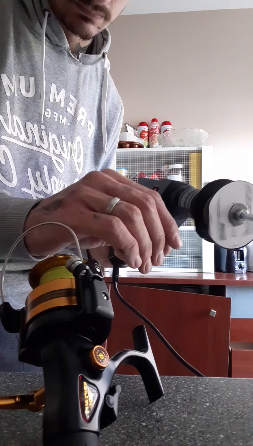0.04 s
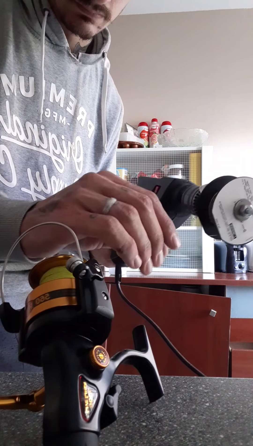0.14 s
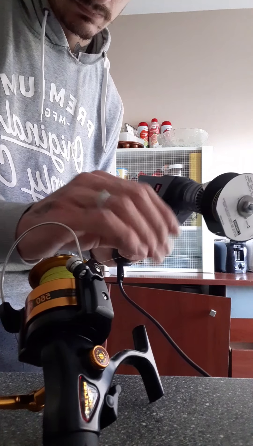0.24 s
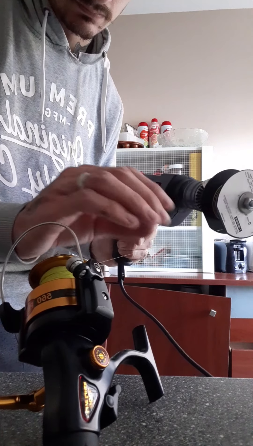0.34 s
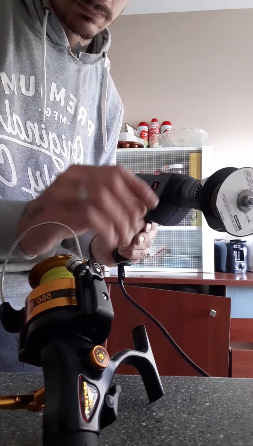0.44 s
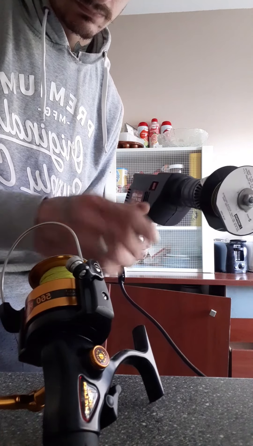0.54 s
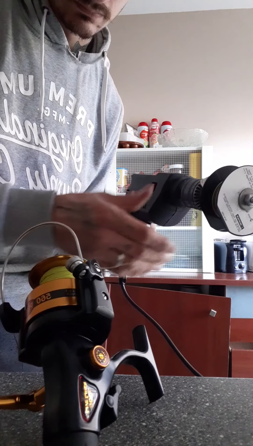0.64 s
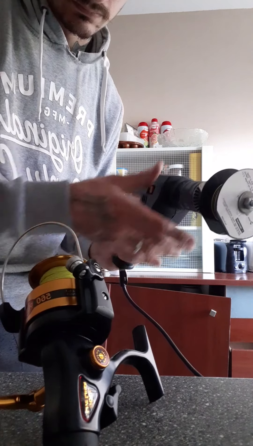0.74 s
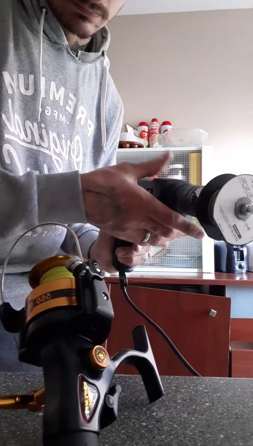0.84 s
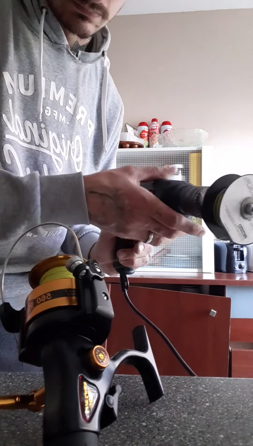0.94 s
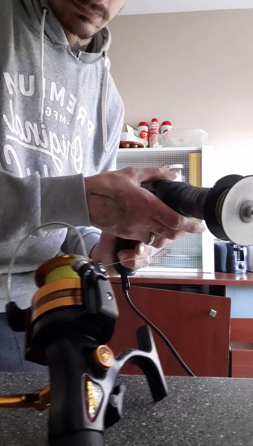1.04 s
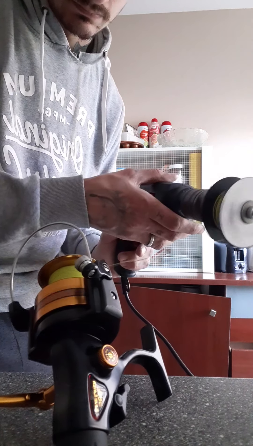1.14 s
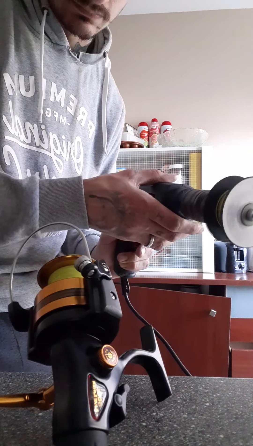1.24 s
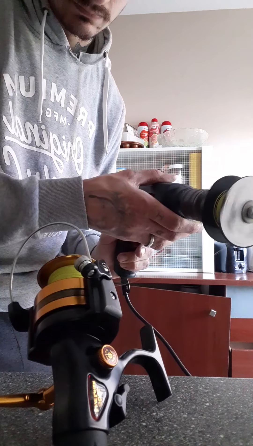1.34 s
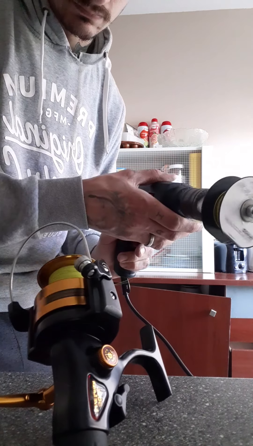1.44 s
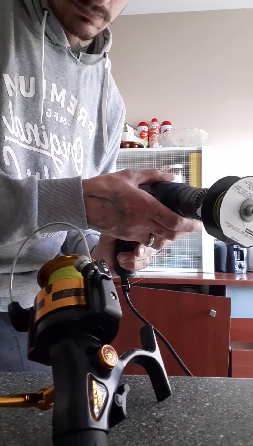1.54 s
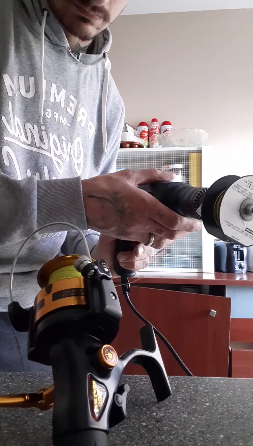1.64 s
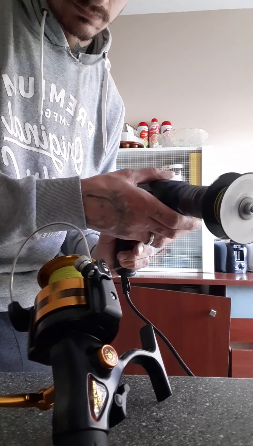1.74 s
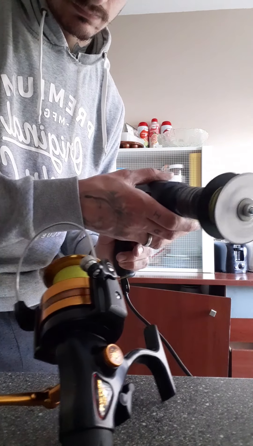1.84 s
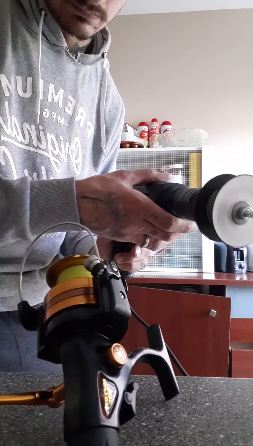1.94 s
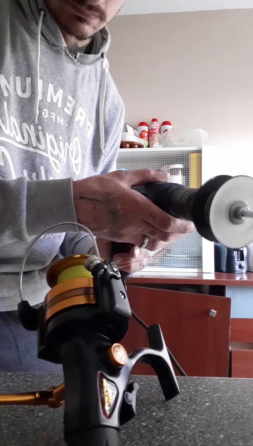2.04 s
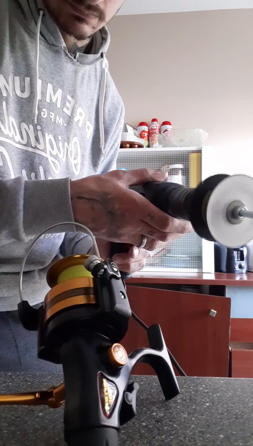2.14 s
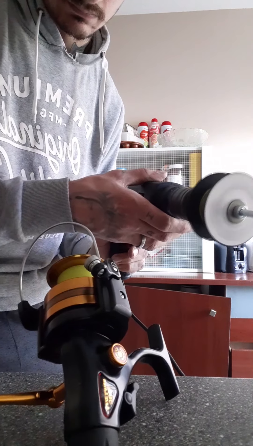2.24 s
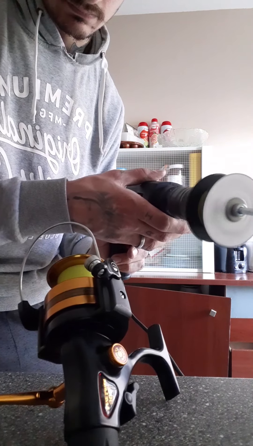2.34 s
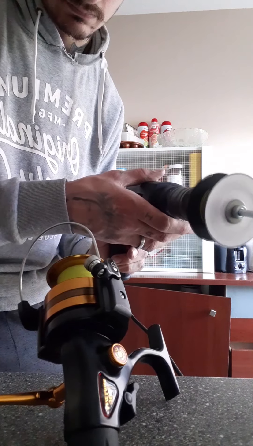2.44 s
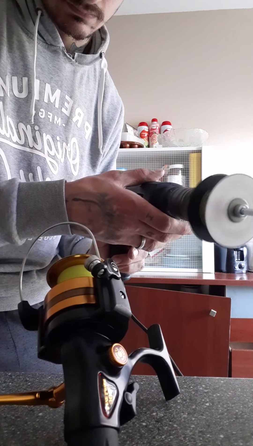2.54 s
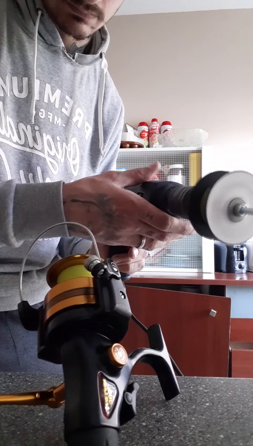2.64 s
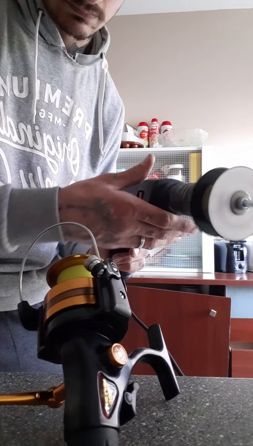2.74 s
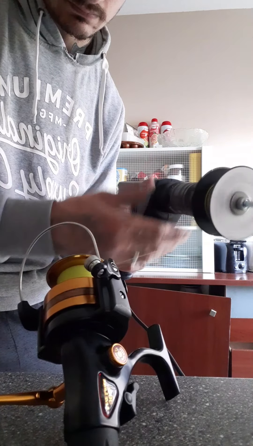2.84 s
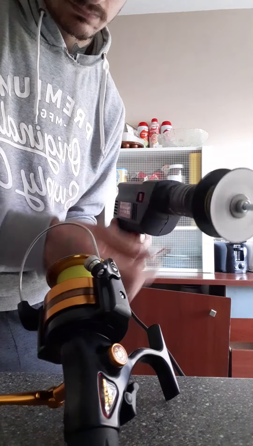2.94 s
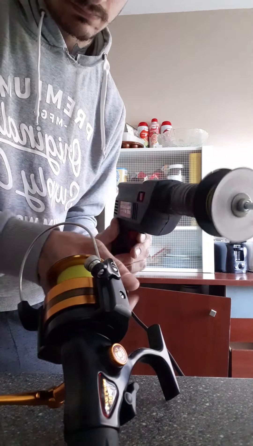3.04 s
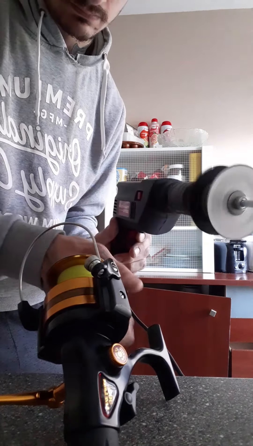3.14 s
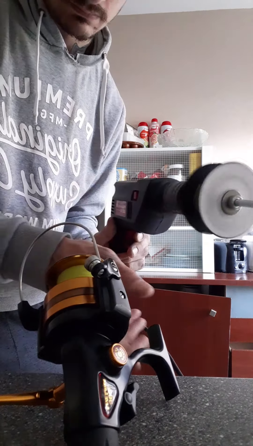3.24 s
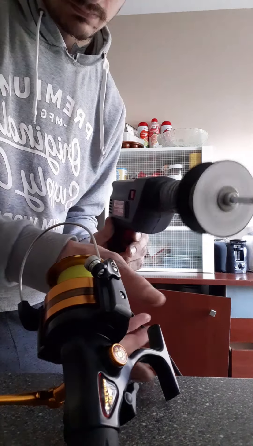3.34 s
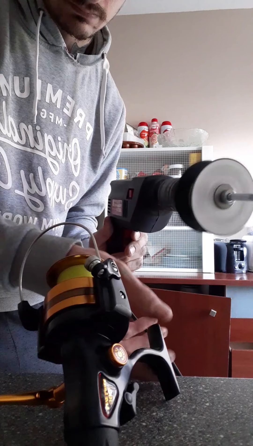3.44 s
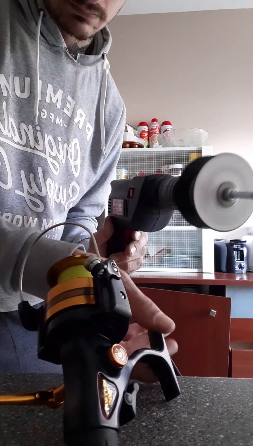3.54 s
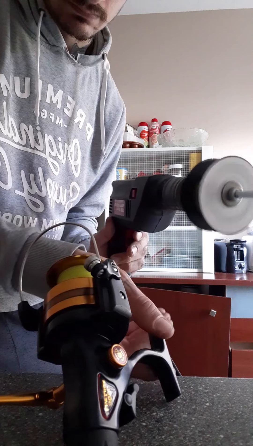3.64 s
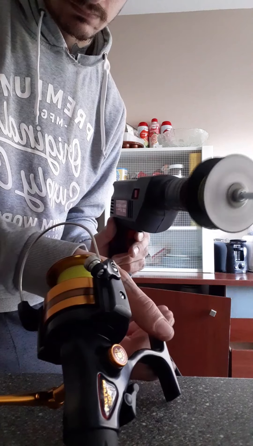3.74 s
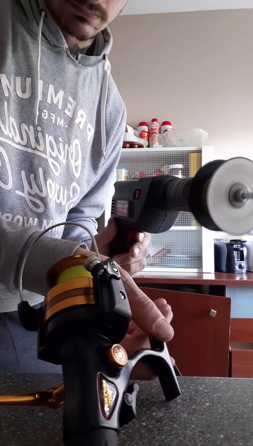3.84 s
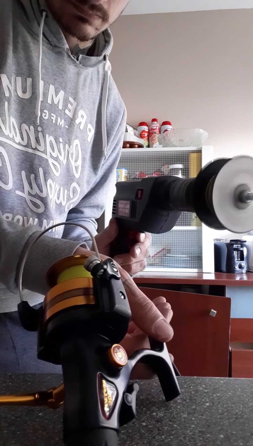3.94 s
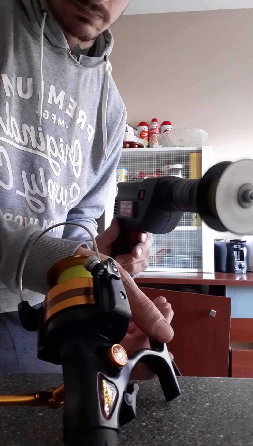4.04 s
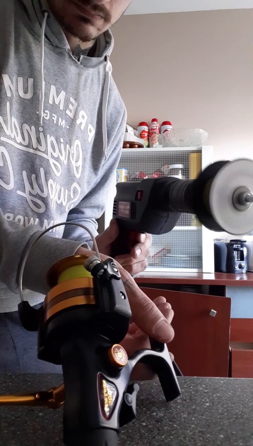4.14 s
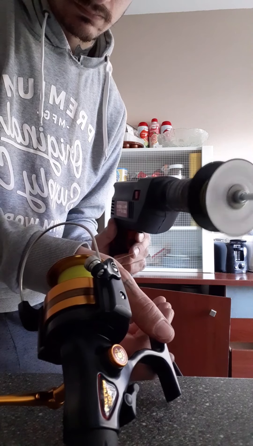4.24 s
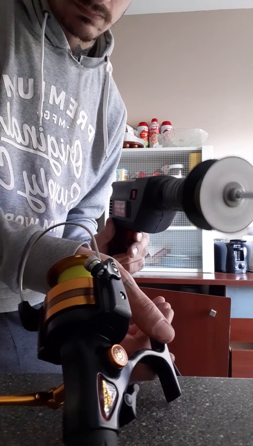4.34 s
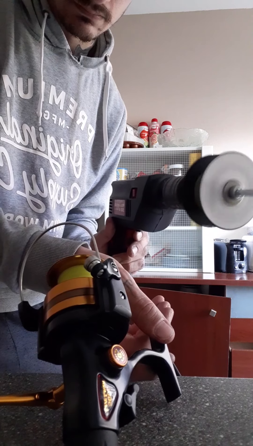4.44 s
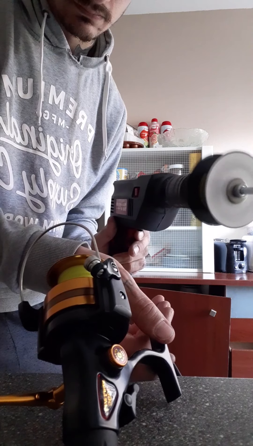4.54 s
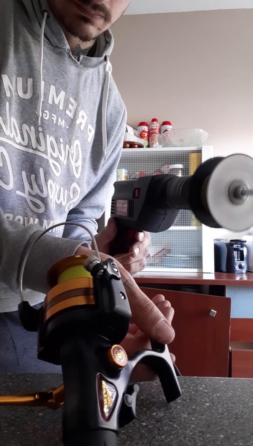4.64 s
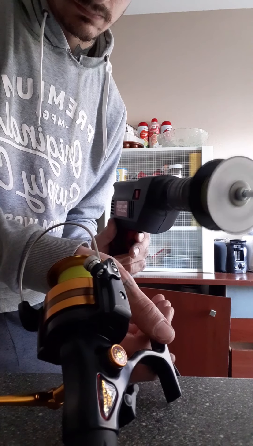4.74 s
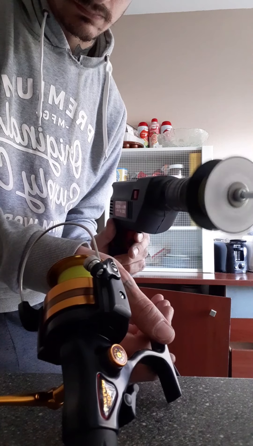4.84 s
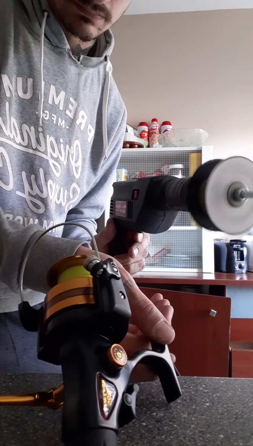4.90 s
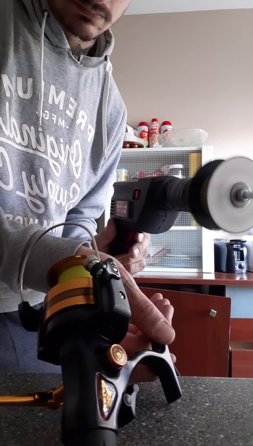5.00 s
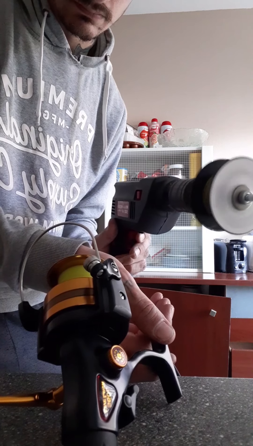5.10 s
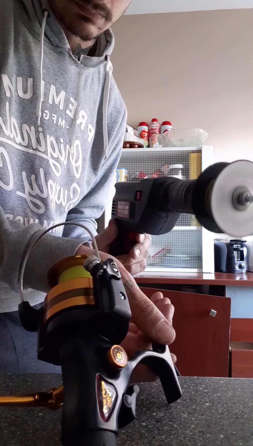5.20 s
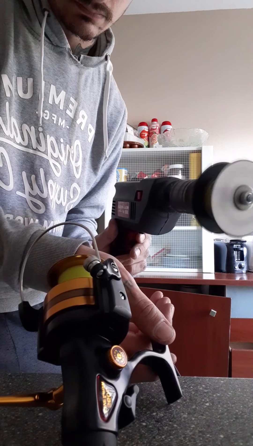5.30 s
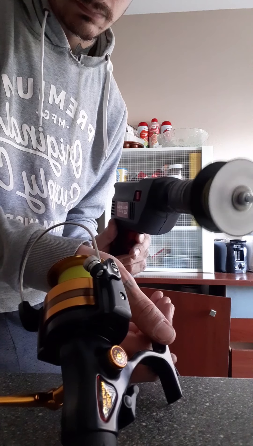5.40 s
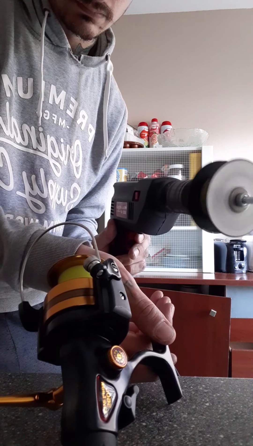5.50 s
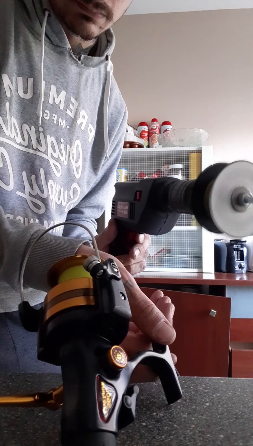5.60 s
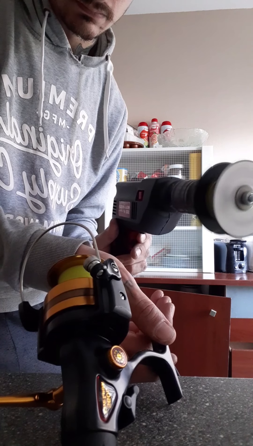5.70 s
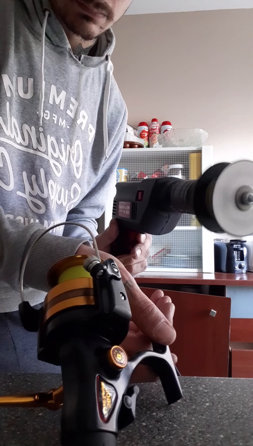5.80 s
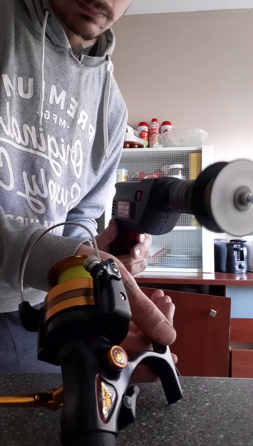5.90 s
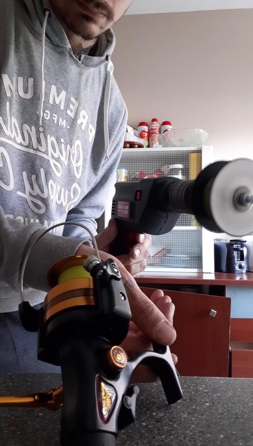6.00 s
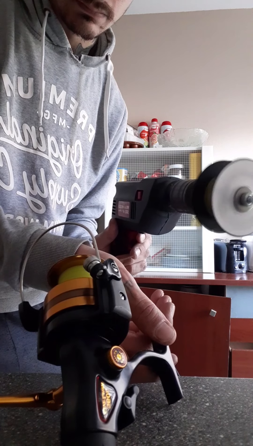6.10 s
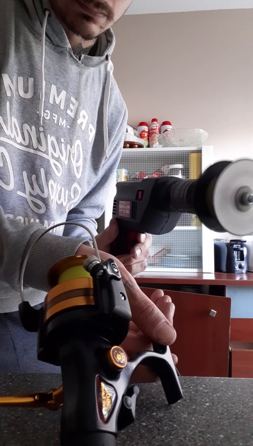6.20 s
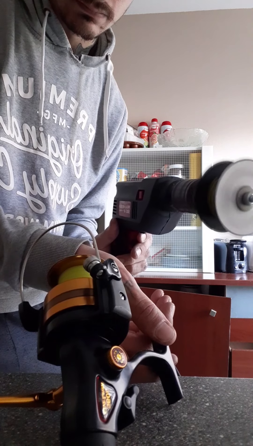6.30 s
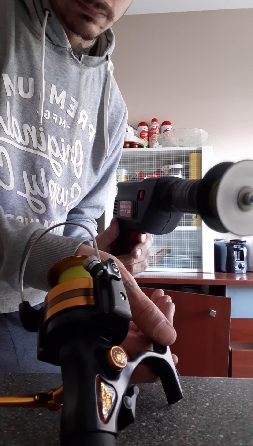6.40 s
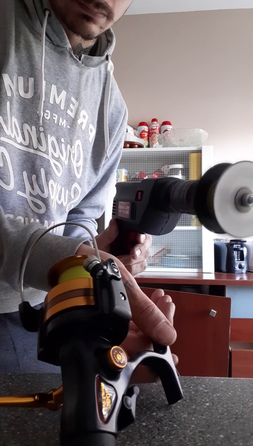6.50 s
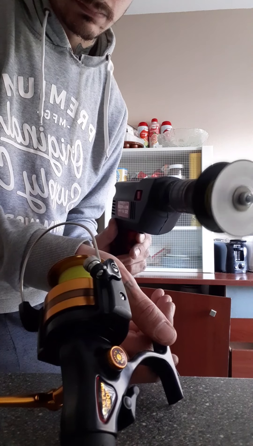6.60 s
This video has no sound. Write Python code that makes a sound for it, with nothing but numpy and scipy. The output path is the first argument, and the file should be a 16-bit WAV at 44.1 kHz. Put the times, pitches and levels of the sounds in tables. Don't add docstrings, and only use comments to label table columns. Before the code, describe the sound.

Close in a small furnished room, a corded drill coasts to a halt with loose gear knocks. After a brief quiet and a faint trigger scuff, one short whirring burst breaks down into clatter. The drill then starts again, climbs, dips and settles into a high, rough whine with fan hiss, swelling and wavering as line pulls on the spool. It sounds from the right only, with very faint hiss on the left.

```python
import sys
import numpy as np
from scipy import signal
from scipy.fft import rfft, irfft
from scipy.io import wavfile
from scipy.ndimage import uniform_filter1d

SR = 44100
rng = np.random.default_rng(int(sys.argv[2]) if len(sys.argv) > 2 else 0)


def level_to_linear(level):
    exponent = np.asarray(level, float) / 20
    return 10 ** exponent


def to_wav(s):
    ch = np.atleast_2d(s).T
    pcm = np.round(np.clip(ch, -1, 1) * 32767)
    wavfile.write(sys.argv[1], SR, pcm.astype(np.int16))


N = 293706
LEAD = SR // 2
TOP_HZ = 15750

# [f/Hz, level per Hz/dB]
DEAD_INPUT = [(25, -11), (90, -3), (250, -7), (1000, -16), (4000, -25), (9000, -28), (12500, -18),
              (15500, -18)]
# [t/s, level/dB]
DEAD_LEVEL = [(0, -76), (.35, -80), (.9, -80), (1.1, -77.5), (1.9, -77.5), (2.4, -81), (6.66, -81.5)]

# [f/Hz, level per Hz/dB]
AIR = [(35, -37), (60, -5), (231, -3.5), (613, -7), (721, 1.5), (810, -7), (1350, -9), (1870, -13.5),
       (5080, -14), (9080, -30.5), (11700, -19), (15500, -21)]
AIR_DB = -71.5
# [f/Hz, width/Hz, level/dB]
HUM = [(222, 40, 2.5), (436, 30, 4), (721, 40, 0.5)]
# [f/Hz, t/s]
ROOM_T60 = [(200, 0.54), (1000, 0.5), (4000, 0.44), (10000, 0.35), (16000, 0.27)]
ROOM_DB = -7

# [start t/s, stop t/s, level lost as it binds/dB]
RUNS = [
    (-1, .14, -22),
    (.95, 1.47, -6),
    (1.668, 7, 0),
]
BIND_S = .14
# [t/s, bar rate asked for f/Hz (0 = let go), lag of the loaded motor t/s]
SQUEEZES = [(0.0, 0, 1.0), (0.943, 3775, 0.418), (1.024, 1635, 0.062), (1.168, 0, 1.0),
            (1.661, 2637, 0.501), (1.786, 1980, 0.088), (1.921, 4720, 0.624), (2.603, 0, 1.0),
            (3.032, 3984, 0.442), (3.618, 3698, 0.244), (3.798, 0, 1.0), (3.967, 4229, 0.225),
            (4.915, 3892, 0.084), (5.194, 4255, 0.22), (5.391, 4056, 0.036), (5.697, 4645, 0.312),
            (6.097, 4331, 0.314), (6.315, 4761, 0.656)]
COAST_HZ_PER_S, FIRST_HZ, REST_HZ = 3794, 600, 50

# [f/Hz, level per Hz/dB]
HOUSING = [(20, -60), (50, -37), (75, -20.5), (110, -21.5), (240, -15), (500, -17), (760, -11.5),
           (1050, -15.5), (1800, -8), (3100, -3.5), (6600, -5), (8800, -12), (11000, -5.5), (13400, -2.5),
           (16000, -7)]
# [f/Hz, width/Hz, level over the housing/dB]
RINGS = [(429.4, 13.4, 4), (731.4, 23, 1.5), (933.4, 19, 6.5), (1225, 95, 11), (2795, 60, 3),
         (3107, 90, 4.5), (4785, 110, 8), (5720, 310, 4.5), (7450, 30, 17.5), (7600, 29, 16),
         (9660, 150, 1), (11400, 180, 2), (13400, 300, -15)]
# [bar rate f/Hz, level/dB, rumble level/dB, growl level/dB, fan hiss level/dB]
DRIVEN = [(50, -50, -30, 4, -18), (200, -39, -40, -2, -24), (560, -28.5, -27, -10, -16),
          (1200, -24.5, -20, -16, -6), (1900, -23.7, -30, -12, -3), (2900, -23, -29, -12, -3),
          (3500, -22.2, -22.5, -12, -2), (4500, -21.3, -21.5, -12, -3.5)]
# [bar rate f/Hz, level/dB, rumble level/dB, growl level/dB, fan hiss level/dB]
COASTING = [(300, -30.5, -27, -14, 0.1), (1300, -27.5, -30, -15, -2), (2100, -24.5, -27, -12.5, -1.5),
            (3700, -22.5, -19, -11, -2)]
KNOCKS_PER_BAR, SPOOL_TURNS_PER_BAR = .097, .0047

# [t/s, peak level/dB, body level/dB]
KNOCKS = [(0.0044, -17, -19), (0.0248, -19, -22), (0.0507, -25, -21), (0.0614, -30, -18),
          (0.0832, -19, -26), (0.123, -22, -29), (0.9473, -42, -13), (0.955, -41, -8), (0.9967, -24, -3),
          (1.0178, -21, -29), (1.0315, -24, -15), (1.052, -19, -16), (1.2522, -20, -20), (1.3401, -19, -18),
          (1.3676, -20, -34), (1.3832, -16.5, -27), (1.403, -19, -29), (1.4283, -18, -23),
          (1.46, -22.5, -31), (1.6714, -44, 3), (1.6827, -36, 10), (1.7026, -38, 7), (1.7436, -27, -6),
          (1.7817, -22, -10), (1.7973, -20, -34), (1.8186, -25, -20), (1.8366, -21, -7), (1.8936, -17, -25),
          (2.0865, -17, -16)]
# [f/Hz, width/Hz, level/dB]
CHUCK_RINGS = [(4770, 25, 13), (7530, 25, 15)]
KNOCK_TREBLE_DB = -3

# (t/s, f/Hz, level/dB)
TRIGGER = (.813, 5000, -52)

# [f/Hz, level/dB]
SONG = [(2000, -54), (2900, -35), (4300, -30.5), (5600, -30), (7700, -36), (8800, -51), (11500, -35.5),
        (13500, -30)]
# [f/Hz, level/dB]
PINION_SONG = [(280, -47), (430, -53), (600, -47), (690, -44), (770, -39), (850, -48), (915, -37),
               (960, -37)]
# [bar rate f/Hz, 1st level/dB, 2nd level/dB, 3rd level/dB, 4th level/dB]
HARMONICS_DB = [(1400, -1.5, -5, -3, -3), (2000, -1.5, -.5, .5, -7), (2600, -.5, .1, -2.5, -7)]
# [t/s, level/dB]
PULL = [(2.6, .1), (2.85, 2), (3.15, 2), (3.6, -1), (3.92, -2.5), (4.2, 1.5), (4.5, -3.5), (4.64, 3),
        (4.88, 2.5), (5.0, -2), (5.15, 2.5), (5.4, -3.5), (5.85, 2), (6.08, -.5), (6.3, 2)]
SONG_FULL_HZ, SONG_ONSET_HZ, POWER_HZ = 1500, 350, 200
SONG_WANDER_DB, SONG_FADE_DB = 1.0, 4.2
SMEAR_HZ = 3400
PINION_TEETH_PER_BAR = 5 / 24

# [multiple of the bar rate, level over the rattle/dB]
GEAR_LINES = [(0.11, 2.026), (10 / 24, 1), (12 / 24, 3.4), (17 / 24, 1.998)]


def unit(x):
    return x / np.sqrt(np.mean(x ** 2))


def curves(rows, t):
    s, *columns = np.transpose(rows)
    return np.array([np.interp(t, s, column) for column in columns])


def colour_db(hz, points, rings=()):
    f, db = np.transpose(points)
    humps = sum(level_to_linear(2 * top_db) / (1 + ((hz - centre) / (width / 2)) ** 2)
                for centre, width, top_db in rings)
    return np.interp(np.log(hz + 1), np.log(f), db) + 10 * np.log10(1 + humps)


def coloured(x, points, rings=(), size=8192):
    hz = np.arange(size // 2 + 1) * SR / size
    cepstrum = irfft(np.log(level_to_linear(colour_db(hz, points, rings))))
    cepstrum[1:size // 2] *= 2
    cepstrum[size // 2 + 1:] = 0
    ring = irfft(np.exp(rfft(cepstrum)))
    return signal.fftconvolve(x, unit(ring) / np.sqrt(size))[:len(x)]


def part(x, hz, kind):
    return signal.sosfiltfilt(signal.butter(2, hz, kind, fs=SR, output="sos"), x)


def tilt(x, edges_hz, dbs):
    lows = [0] + [part(x, hz, "low") for hz in edges_hz] + [x]
    return sum((upper - lower) * level_to_linear(db) for lower, upper, db in zip(lows, lows[1:], dbs))


def walk(t, rate):
    k = int(SR / rate)
    steps = np.repeat(rng.standard_normal(len(t) // k + 1), k)
    return unit(uniform_filter1d(uniform_filter1d(steps, k), k)[:len(t)])


def puffs(starts, decay_s):
    return signal.lfilter([1], [1, -np.exp(-1 / (decay_s * SR))], starts)


def dead_input():
    level_db = curves(DEAD_LEVEL, np.arange(N) / SR)[0]
    return level_to_linear(level_db) * coloured(rng.standard_normal(N), DEAD_INPUT)


def quiet_air(t):
    level = level_to_linear(AIR_DB + 5.5 + 1.0 * walk(t, 13))
    return level * coloured(rng.standard_normal(len(t)), AIR, HUM)


def room(x):
    s = np.arange(SR // 2) / SR
    f, t60s = np.transpose(ROOM_T60)
    tail = 0
    for hz in 125 * 2 ** np.arange(0, 7.1):
        t60 = np.interp(np.log(hz), np.log(f), t60s)
        octave = [hz / np.sqrt(2), min(hz * np.sqrt(2), 21000)]
        tail = tail + part(rng.standard_normal(len(s)), octave, "band") * level_to_linear(-60 * s / t60)
    tail *= np.clip((s - .003) / 0.0091, 0, 1)
    return level_to_linear(ROOM_DB) * signal.fftconvolve(x, tail / np.sqrt(np.sum(tail ** 2)))[:len(x)]


def speed(t):
    hz, driven, now = np.full(len(t), 1. * FIRST_HZ), np.zeros(len(t)), FIRST_HZ
    stops = [row[0] for row in SQUEEZES[1:]] + [t[-1]]
    for (start, asked, lag), stop in zip(SQUEEZES, stops):
        since = np.maximum(np.append(t, stop) - start, 0)
        if asked:
            law = asked + (now - asked) * np.exp(-since / lag)
        else:
            law = np.maximum(now - COAST_HZ_PER_S * since, REST_HZ)
        hz, now = np.where(t >= start, law[:-1], hz), law[-1]
        driven[t >= start] = bool(asked)
    return hz, uniform_filter1d(driven, SR // 20)


def rattle(t, hz):
    tooth = np.floor(np.cumsum(hz * KNOCKS_PER_BAR * (1 + 0.054 * walk(t, 60))) / SR).astype(int)
    size = level_to_linear(4.2 * np.minimum(rng.exponential(size=tooth[-1] + 1), 3.5) - 5.0)
    starts = np.diff(tooth, prepend=0) * size[tooth] * np.clip((hz - 700) / 300, 0, 1)
    wobble = 1 + 0.043 * np.sin(2 * np.pi * np.cumsum(hz * SPOOL_TURNS_PER_BAR) / SR)
    swell = level_to_linear(.3 * walk(t, 2.3) + 0.33 * walk(t, 18))
    fan = np.clip(hz / 3000, .4, 1)
    shake = (fan + 0.85 * puffs(starts, 0.0018)) * wobble * swell
    shake /= np.sqrt(uniform_filter1d(shake ** 2, SR // 4))
    return coloured(shake * rng.standard_normal(len(t)), HOUSING, RINGS)


def knocks(t):
    out, s = np.zeros(len(t) + SR), np.arange(SR // 6) / SR
    for start, db, body_db in KNOCKS:
        spit = rng.standard_normal(len(s)) * np.exp(-s / 0.0013)
        blow = coloured(spit, HOUSING, RINGS + CHUCK_RINGS)
        blow = tilt(blow, [3500, 8500], [body_db - 3.5, 0, KNOCK_TREBLE_DB])
        blow /= 20 * np.std(part(blow, [4000, 8500], "band"))
        out[int(start * SR) + LEAD:][:len(s)] += level_to_linear(db + 7.5) * blow
    return out[:len(t)]


def trigger(t):
    s, hz, db = TRIGGER
    scuff = part(rng.standard_normal(len(t)), [.8 * hz, 1.25 * hz], "band")
    return level_to_linear(db) * scuff * (t > s) * np.exp(-np.abs(t - s) / .008)


def tone(t, phase, multiple, db, fade_db, smear=1):
    shudder = (.45 + .3 * multiple) * walk(t, 70) + .6 * walk(t, 300)
    flicker = np.minimum(.7 * walk(t, 25) + .7 * walk(t, 70), .8)
    return np.sqrt(2) * level_to_linear(db + fade_db * flicker) * np.sin(multiple * phase + smear * shudder)


def song(t, hz, driven, phase, lumps_db):
    smear = np.clip(SMEAR_HZ / hz, .8, 2.2)
    pull_db = curves(PULL, t)[0]
    out = 0
    for k, share_db in enumerate(curves(HARMONICS_DB, hz), 1):
        db = colour_db(k * hz, SONG) + share_db + 5.5 + pull_db + SONG_WANDER_DB * walk(t, 10)
        db = db - 80 * (k * hz > TOP_HZ)
        out = out + tone(t, phase, k, db, SONG_FADE_DB, smear)
    mesh_db = colour_db(PINION_TEETH_PER_BAR * hz, PINION_SONG) + 4.0 + lumps_db + 1.2 * walk(t, 6)
    out = out + tone(t, phase, PINION_TEETH_PER_BAR, mesh_db, fade_db=2.2, smear=.65)
    return out * np.clip(1 + (hz + POWER_HZ * driven - SONG_FULL_HZ) / SONG_ONSET_HZ, 0, 1)


def gear_lines(t, hz, phase):
    grid = np.linspace(0, SR / 2, 4096)
    whole_db = 10 * np.log10(np.sum(level_to_linear(2 * colour_db(grid, HOUSING, RINGS))) * grid[1] / 50)
    out = 0
    for k, over_db in GEAR_LINES:
        db = over_db + colour_db(k * hz, HOUSING, RINGS) - whole_db - 80 * (k * hz > 15600)
        out = out + tone(t, phase, k, db, fade_db=6.0)
    return out * np.clip(hz / 1200 - 1.5, 0, 1)


def drill(t):
    hz, driven = speed(t)
    phase = 2 * np.pi * np.cumsum(hz) / SR
    levels = driven * curves(DRIVEN, hz) + (1 - driven) * curves(COASTING, hz)
    db, rumble_db, growl_db, hiss_db = levels
    turning = 0
    for start, stop, lost_db in RUNS:
        binding = np.clip(1 - (stop - t) / BIND_S, 0, 1)
        turning = turning + (t > start) * (t < stop) * level_to_linear(lost_db * binding)
    lumps_db = 3 * np.sin(SPOOL_TURNS_PER_BAR * phase) + 1.0 * walk(t, 30)
    shudder_db = .7 * walk(t, 6)
    rumble_db = rumble_db + 25.5 + lumps_db + shudder_db
    growl_db = growl_db + 14 + lumps_db + .6 * shudder_db
    body = rattle(t, hz) + gear_lines(t, hz, phase)
    body = tilt(body, [570, 1550, 8000], [rumble_db, growl_db, 0, hiss_db + 3])
    body *= level_to_linear(db + 6.5 + .45 * walk(t, 14)) * uniform_filter1d(turning, SR // 300)
    return body + knocks(t) + trigger(t) + song(t, hz, driven, phase, lumps_db)


def scene():
    t = np.arange(-LEAD, N) / SR
    near = drill(t)
    right = (near + room(near) + quiet_air(t))[LEAD:]
    return np.array([0 * right, right])


def low_pass(x):
    return signal.sosfilt(signal.butter(12, 17090, fs=SR, output="sos"), x)


def record(dry):
    right = np.tanh(.9 * dry[1]) / .9
    top = signal.ellip(10, .2, 70, TOP_HZ, fs=SR, output="sos")
    mix = signal.sosfilt(top, [dead_input(), right])
    return low_pass(mix)


dry = scene()
out = record(dry)
to_wav(out)
```